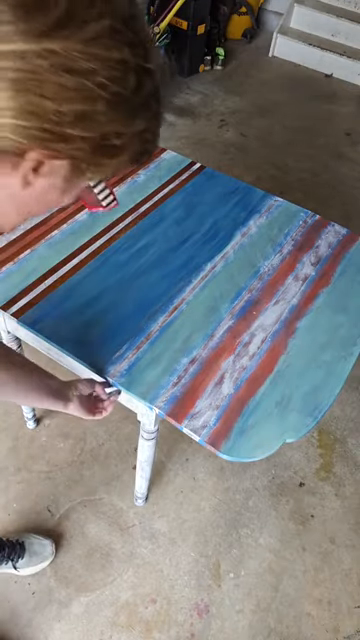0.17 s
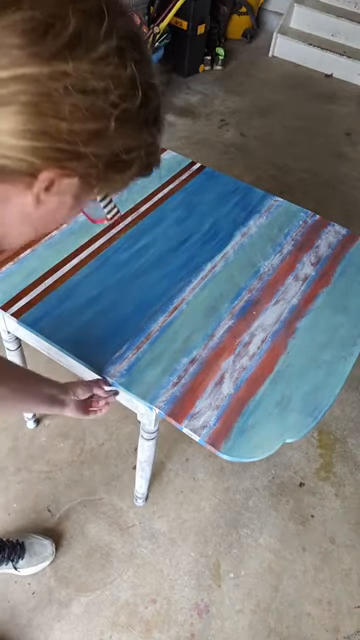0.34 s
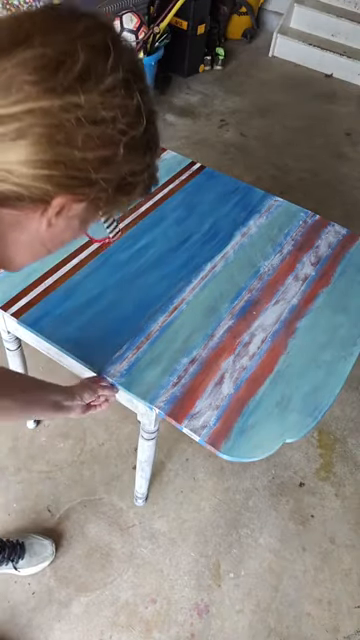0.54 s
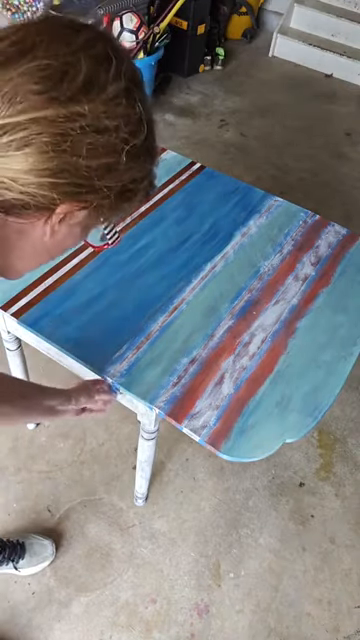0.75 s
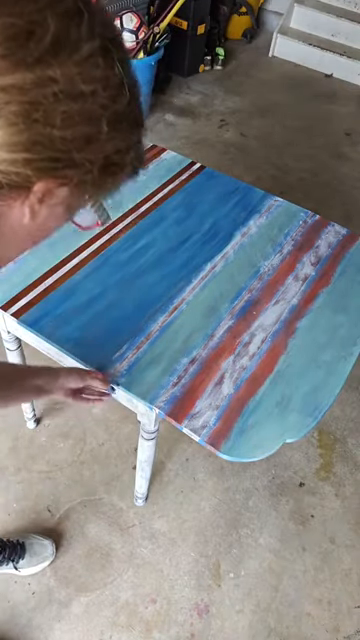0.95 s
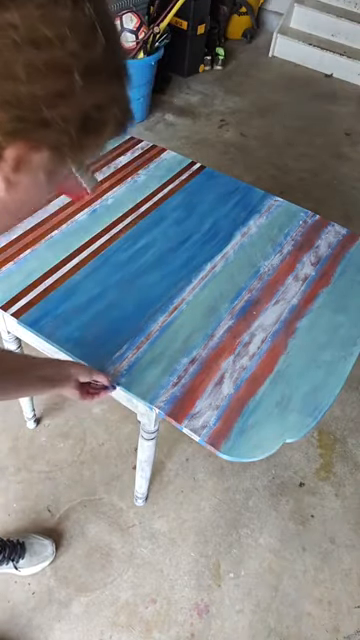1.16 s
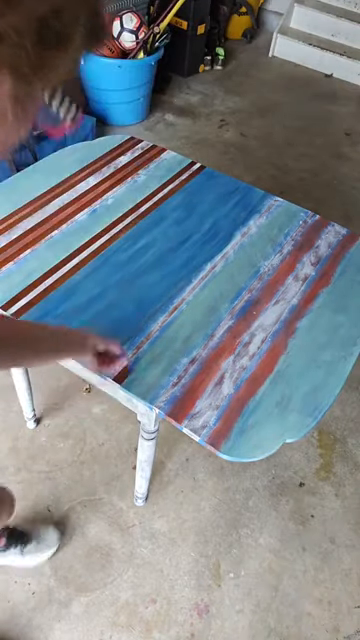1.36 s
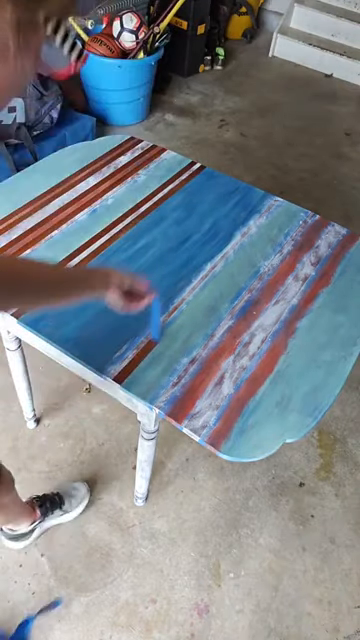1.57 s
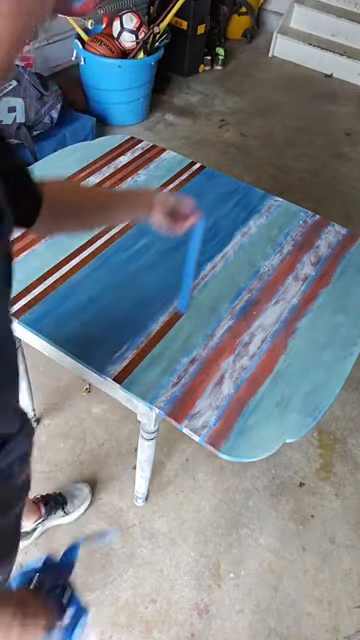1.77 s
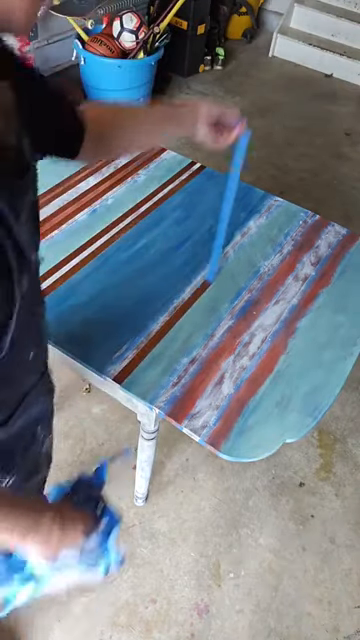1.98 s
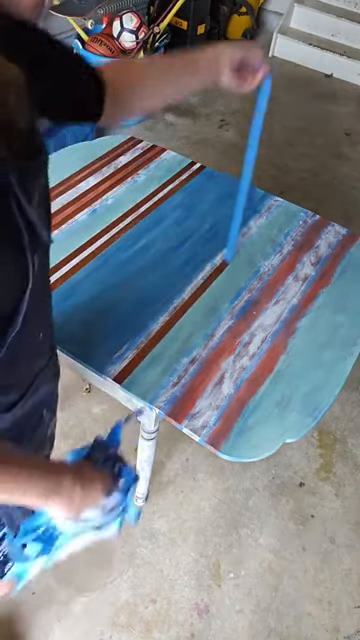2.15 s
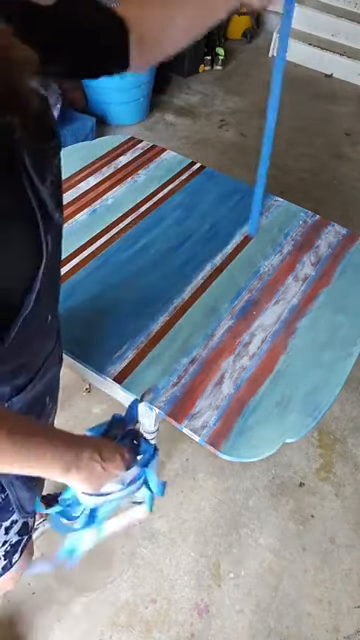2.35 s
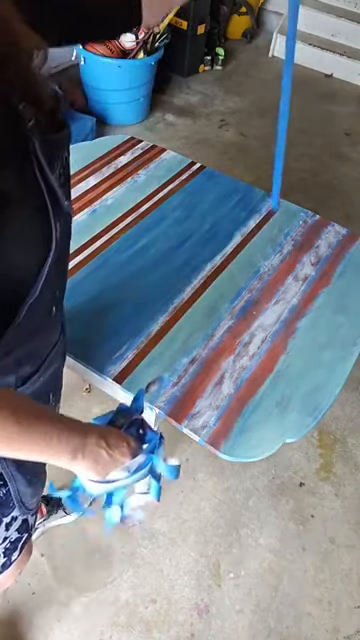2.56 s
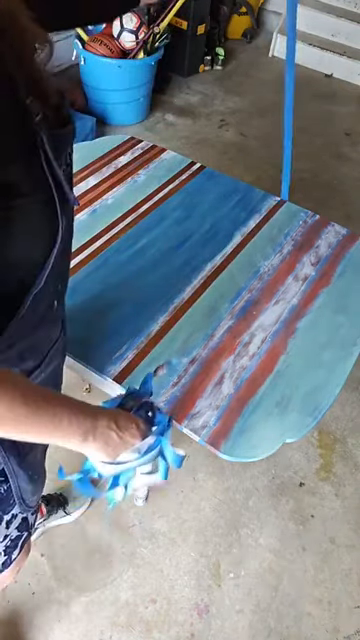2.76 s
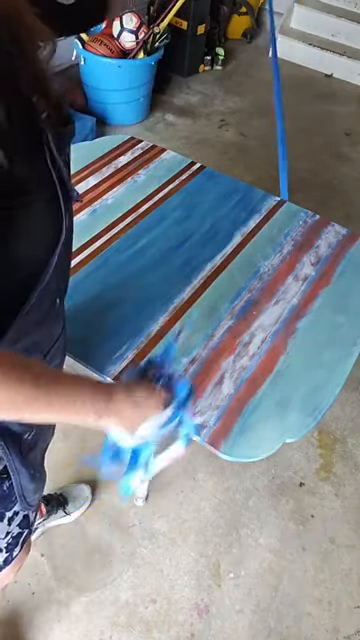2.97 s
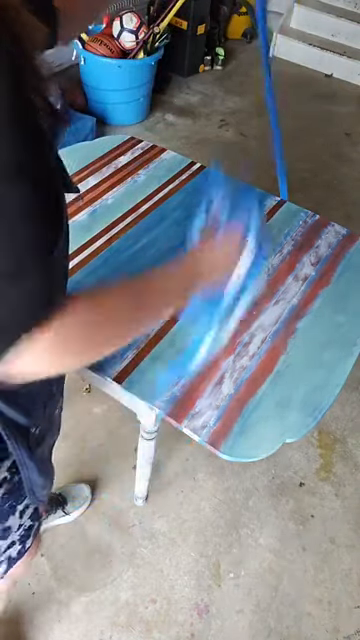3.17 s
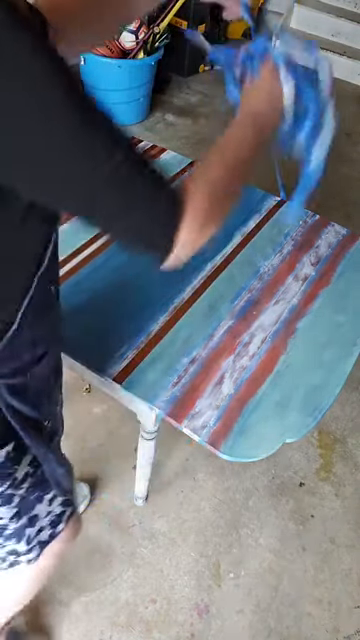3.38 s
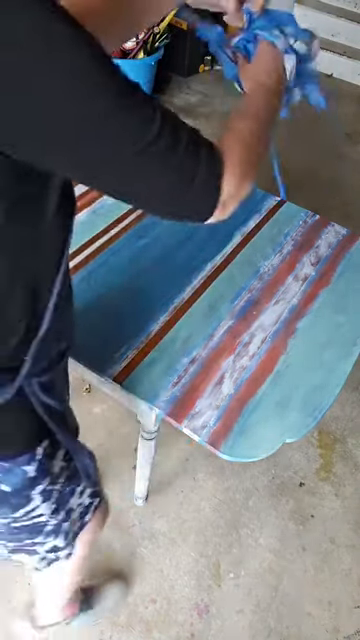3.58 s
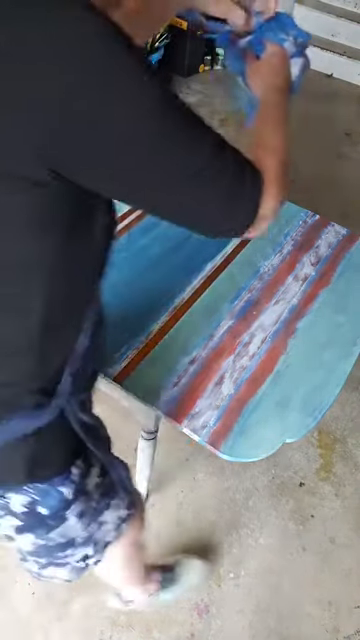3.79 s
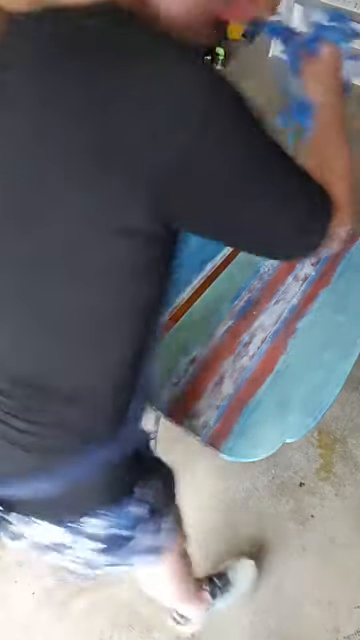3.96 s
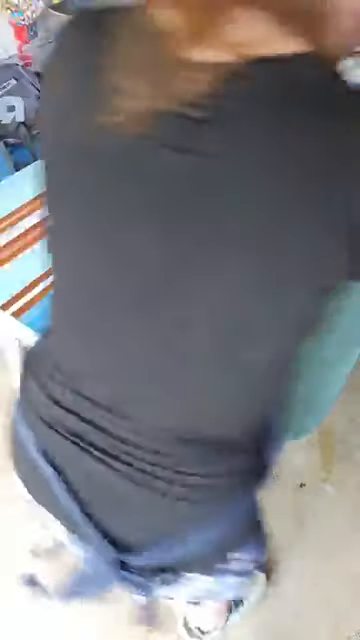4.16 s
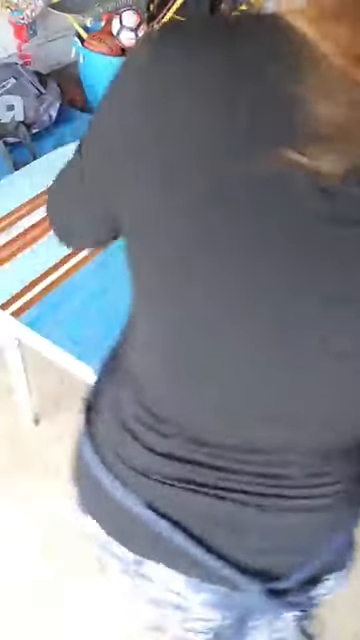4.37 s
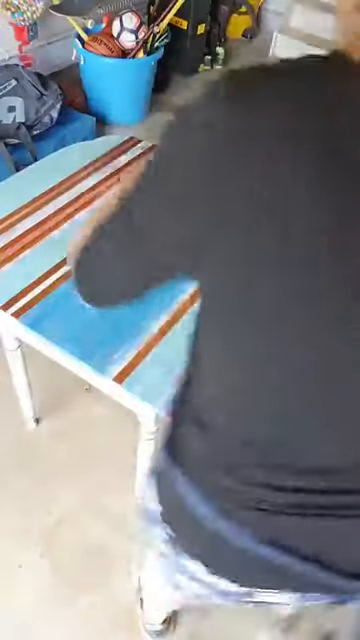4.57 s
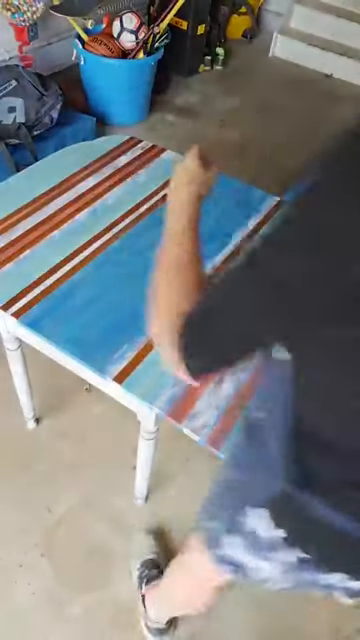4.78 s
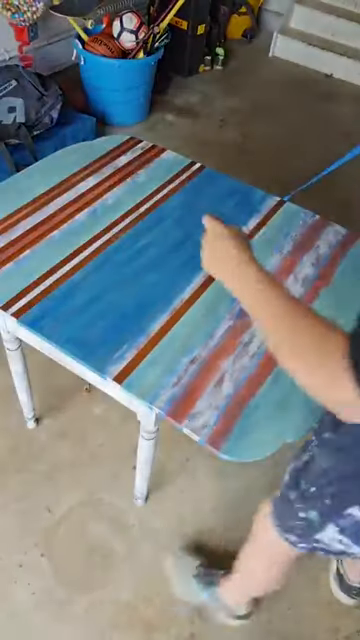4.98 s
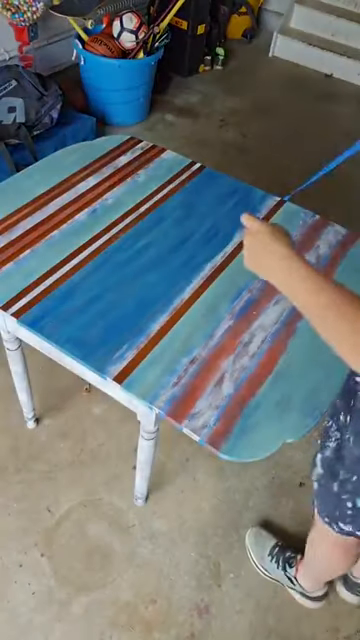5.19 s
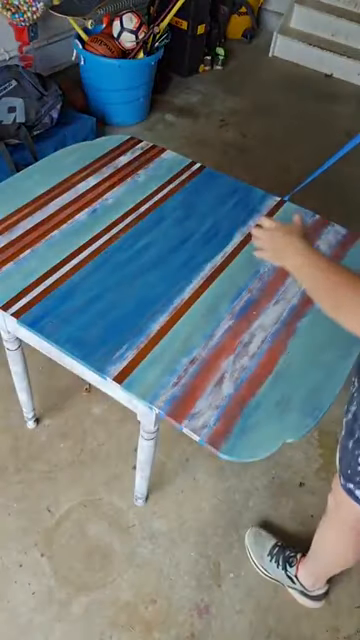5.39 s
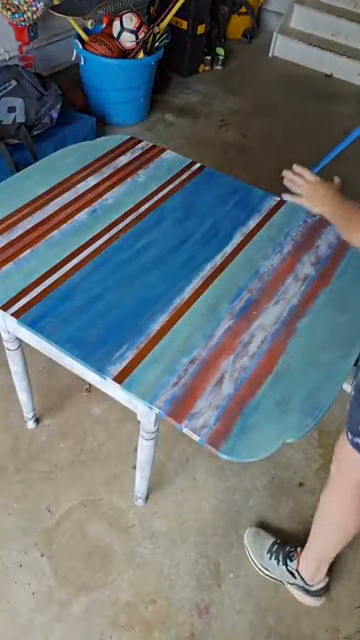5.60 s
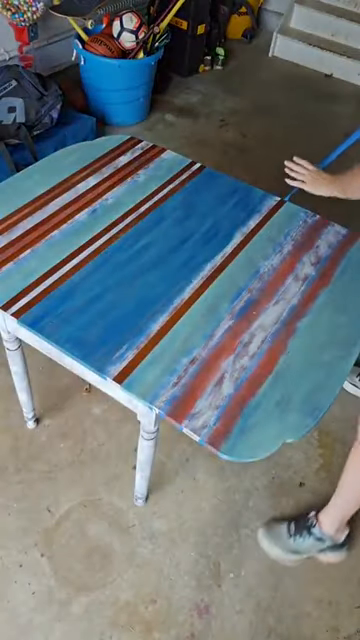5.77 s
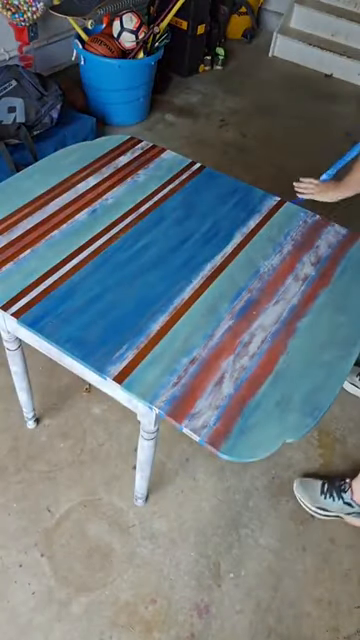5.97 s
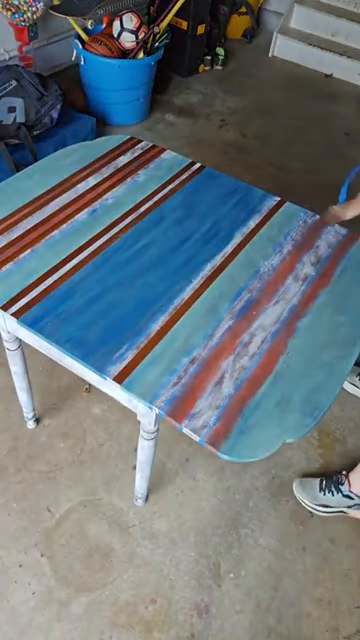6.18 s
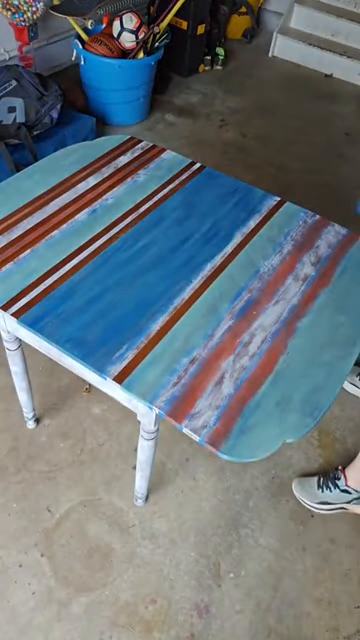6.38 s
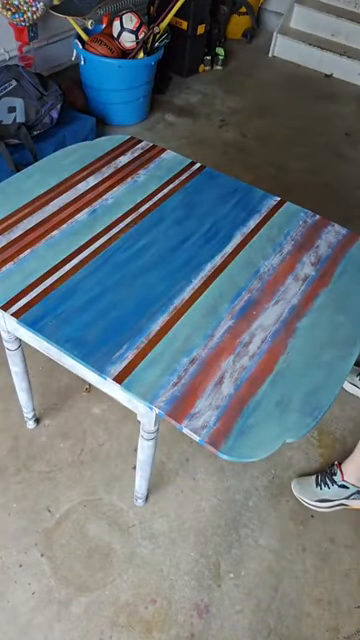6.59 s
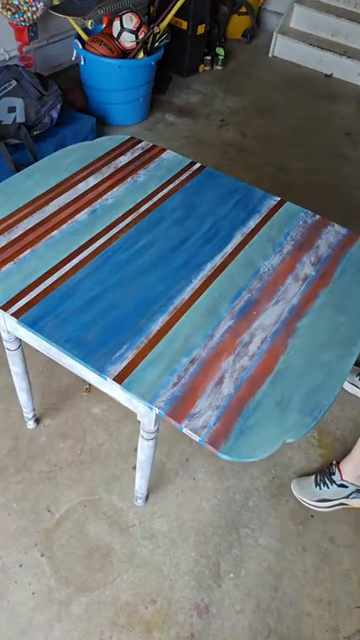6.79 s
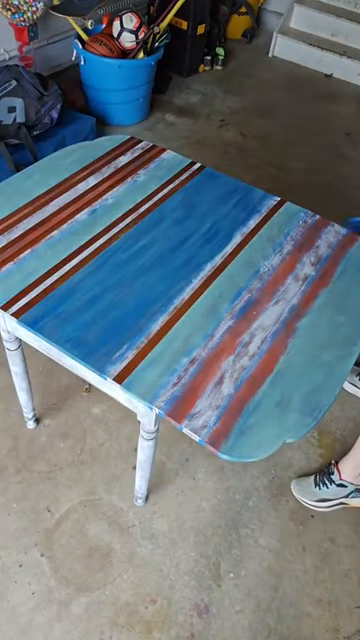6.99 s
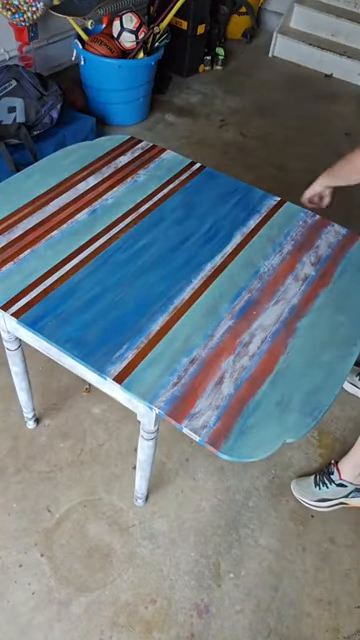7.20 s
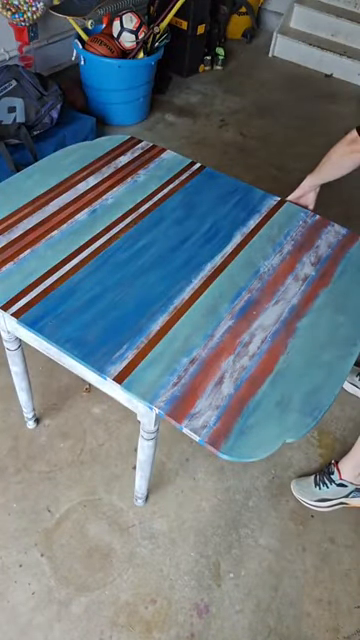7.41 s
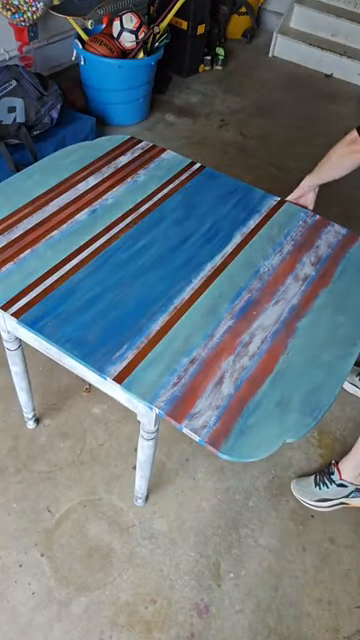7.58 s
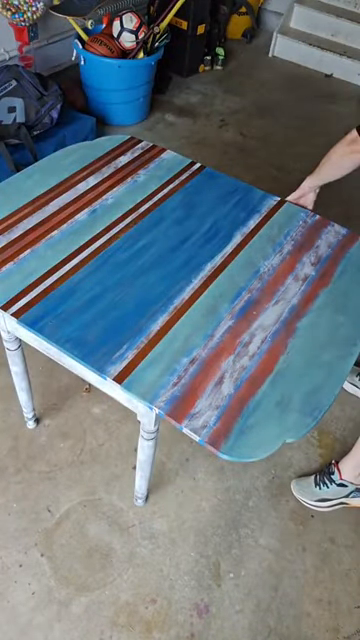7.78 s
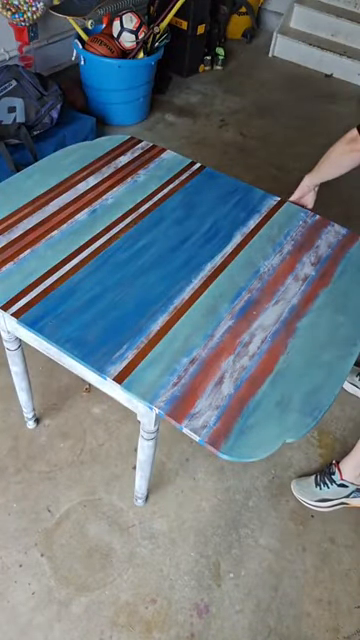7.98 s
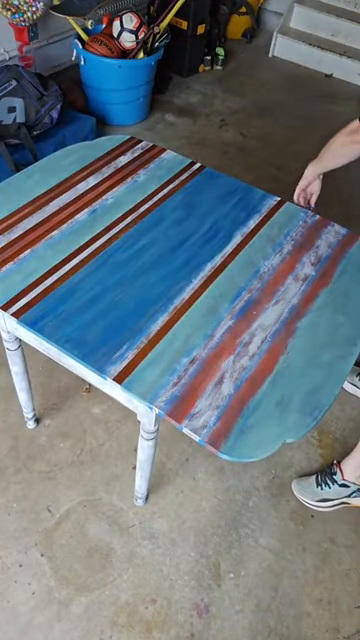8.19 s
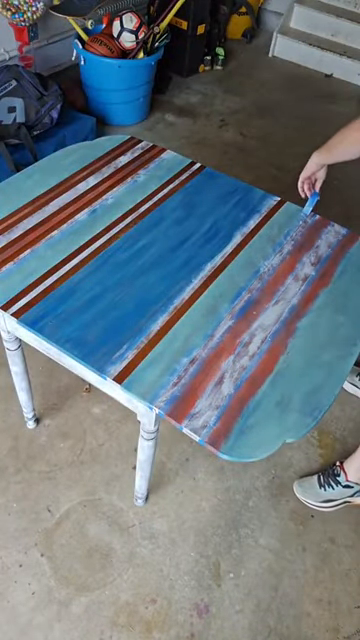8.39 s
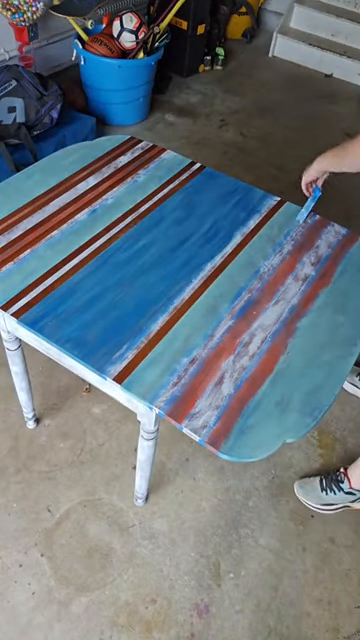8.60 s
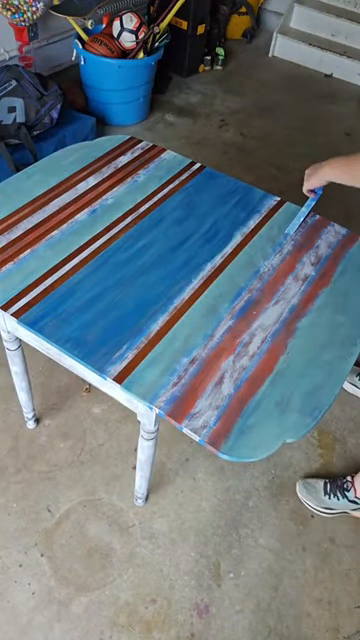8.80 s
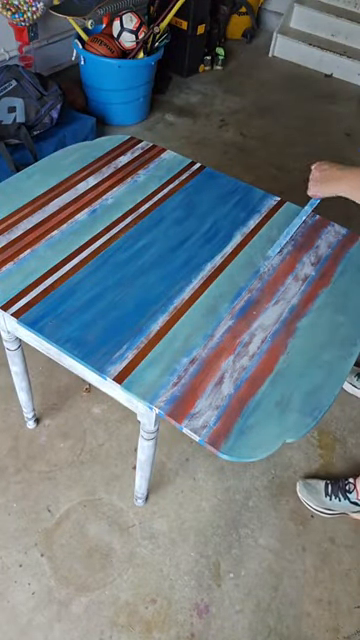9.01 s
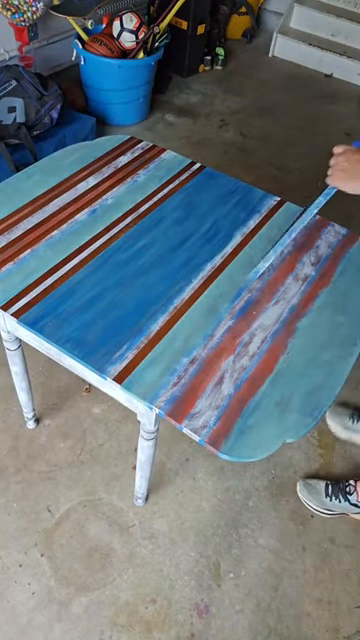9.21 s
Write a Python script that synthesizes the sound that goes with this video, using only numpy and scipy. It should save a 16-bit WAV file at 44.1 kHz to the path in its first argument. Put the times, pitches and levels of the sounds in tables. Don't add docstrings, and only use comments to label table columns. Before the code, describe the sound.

A close stereo microphone in a concrete garage with a short, hard echo; low motor hum, a faint distant engine and soft hiss throughout. At 0.1 s a click and gritty shoe scuff, then tiny nail picks and papery fumbling, with a tap at 0.7. From about 1.3 to 2.75 s tape peels off a wooden table: a dense, loud, buzzing rasp with airy hiss, ringing the tabletop and climbing unevenly in pitch, then stopping abruptly. A small tap at 3.07; from 3.1 to 4 s a ball of tape crinkles with sharp snaps. Shoes scrape and step on grit from 4.1 to 5.2, strongest near 4.4 and 4.9. Crinkles and softer steps return around 5.6 to 7.15, loudest near 6.0 and 6.65. A quiet gap, a firm knock at 8.07, then a second, shorter peel from 8.35, broken by a hard knock at 8.57, wavering up and down until the end at 9.25.

```python
import sys
import numpy as np
from scipy import signal
from scipy.fft import rfft, irfft
from scipy.io import wavfile
from scipy.ndimage import uniform_filter1d

SR = 44100
rng = np.random.default_rng(int(sys.argv[2]) if len(sys.argv) > 2 else 0)


def transcribe(u):
    v = np.clip(np.atleast_2d(u).T, -1, 1)
    q = np.round(v * 32767).astype(np.int16)
    wavfile.write(sys.argv[1], SR, q)


def boost(x):
    u = np.asarray(x, float) / 20
    return 10 ** u


N = 407925

MODE_HZ = [55, 95, 140, 222, 261, 292, 348, 410, 481, 548, 620, 690, 807, 889, 976, 1053, 1227, 1440, 1645,
           2280]
# width/Hz, level/dB
MODE_SHAPE = [(25, -2.5), (15.9, -11.5), (15.6, 4.5), (32, -6), (16.2, 6), (17.9, 1), (18.6, 4), (30.5, -9),
              (24.2, -0.5), (22.7, 2.5), (30, 0), (16.4, 2), (24, 4.5), (18.2, 7.5), (29.8, -1),
              (30.1, -42), (20, -1), (50.3, -18), (18, -3.5), (41.3, -20)]


def evened(x):
    return x / np.sqrt(np.mean(x ** 2) + 1e-20)


def read(points, hz):
    f, value = np.transpose(points)
    return np.interp(np.log(hz + 1), np.log(f + 1), value)


def track(tables, column, rest):
    t, out = np.arange(N) / SR, np.full(N, float(rest))
    for rows in tables:
        s, value = np.transpose(rows)[[0, column]]
        inside = (t >= s[0]) & (t <= s[-1])
        out[inside] = np.interp(t[inside], s, value)
    return out


def colour(x, points):
    log_gain = np.log(boost(read(points, abs(np.fft.fftfreq(8192, 1 / SR)))))
    taps = np.fft.ifft(np.exp(np.conj(signal.hilbert(log_gain)))).real[:4096]
    return signal.oaconvolve(x, taps)[:len(x)]


def band(x, lo_hz, hi_hz):
    sos = signal.butter(2, [lo_hz, min(hi_hz, SR / 2.1)], "band", fs=SR, output="sos")
    return signal.sosfilt(sos, x)


def resonate(x, hz, width_hz):
    return signal.lfilter(*signal.iirpeak(hz, hz / width_hz, SR), x)


def drift(per_s, step=1):
    knots = rng.standard_normal(4000)
    return np.interp(np.arange(0, N, step) / SR * per_s, np.arange(len(knots)), knots)


def grains(per_s, spread_db, clump_db, clumps_per_s):
    hit = rng.random(N) < per_s / SR
    size = np.minimum(rng.exponential(1, N), 5)
    sign = rng.choice([-1., 1.], N)
    return evened(hit * sign * boost(spread_db * size + clump_db * drift(clumps_per_s)))


def strokes(rows):
    power = np.zeros(N // 16 + 1)
    t = np.arange(len(power)) * 16 / SR
    for s, db, swell_s, fade_s in rows:
        power += boost(db - 20 * np.maximum((s - t) / swell_s, (t - s) / fade_s)) ** 2
    return np.repeat(np.sqrt(power), 16)[:N]


def peel():
    # t/s, panel level/dB, favoured pitch f/Hz, stiffness of the wood under the peel point (0-1)
    pulls = [
        [(1.2, -88.5, 227, 1), (1.364, -50.5, 252, 0.17), (1.434, -42.5, 260, 0.3), (1.78, -40, 307, 0),
         (1.86, -37.5, 360, 0.43), (2.302, -41.5, 390, 0.7), (2.4, -37, 390, 0.59), (2.6, -38.5, 430, 0.84),
         (2.68, -35.5, 504, 0.65), (2.72, -46.5, 405, 0.45), (2.79, -77, 450, 0)],
        [(8.34, -83, 452, 0.7), (8.398, -44.5, 480, 0.37), (8.5, -61, 342, 0.76), (8.58, -45, 250, 0.18),
         (8.792, -45, 273, 0.63), (8.93, -41, 348, 0.25), (9.03, -44.5, 408, 0.36), (9.08, -43, 460, 0),
         (9.14, -41, 384, 0.3), (9.25, -41.5, 294, 0.58)],
    ]
    # t/s, f/Hz
    leg_path = [(1.2, 85), (1.9, 80), (2.85, 110), (8.3, 160), (9.25, 160)]
    # t/s,
    # mode f/Hz, gain/dB, half length/s
    surges = [(1.51, 137, 11, 0.022), (1.49, 261, 2, 0.053), (1.656, 548, 6, .04), (1.704, 261, 3.5, .05),
              (1.785, 548, 11, .03), (1.853, 292, 4, .04), (1.89, 690, 5.5, .04), (1.92, 348, 5, 0.055),
              (1.965, 889, 10, 0.033), (2.017, 548, 11, 0.14), (2.026, 348, 4, 0.032),
              (2.184, 889, 10, 0.1), (2.183, 348, 5, 0.049), (2.286, 889, 4, 0.028), (2.42, 348, 1, 0.045),
              (2.414, 807, 9.5, 0.031), (2.454, 548, 1, 0.042), (2.501, 889, 9, 0.018),
              (2.565, 1227, 5, 0.061), (2.575, 807, 10, 0.022), (2.66, 548, 5, 0.026),
              (2.65, 481, 2, 0.021), (2.702, 137, 12, 0.025), (2.752, 292, 19, 0.056), (1.5, 548, -8, 0.11),
              (2.554, 548, -2, 0.036), (8.6, 548, -7, 0.1), (9.04, 348, -2, .02), (8.624, 137, 4.5, 0.045),
              (8.73, 137, 3, 0.027), (8.74, 1645, 9, .05), (8.4, 222, 12, .05), (8.667, 222, 6, .04),
              (8.774, 222, 7, 0.026), (8.782, 889, 7, 0.035), (8.83, 222, 23, 0.035),
              (8.872, 889, 19.5, 0.046), (8.891, 481, 17, 0.05), (8.938, 348, 6, 0.04),
              (8.983, 548, 10, 0.034), (9.008, 348, 8.5, 0.043), (9.032, 889, 22, 0.033),
              (9.085, 348, 12.5, 0.054), (9.076, 548, 14, 0.048), (9.164, 348, 9, 0.029),
              (9.18, 137, 2, 0.04), (9.22, 1645, 19, 0.042), (9.22, 292, 11, 0.037)]
    # f/Hz, level/dB per Hz
    rasp = [(60, -29), (100, -19), (200, -3), (400, 17), (800, 7), (1500, -33), (3000, -50), (6000, -14),
            (16000, -19)]
    # f/Hz, level/dB per Hz
    glue = [(800, -49), (1400, 2.5), (2000, 1.5), (3200, -9), (5500, -3), (8000, -7.5), (11000, -13),
            (16000, 1)]

    step = 64

    def every_sample(control):
        return np.repeat(control, step)[:N]

    level_db, stiff = track(pulls, 1, -120), track(pulls, 3, 0)
    favoured_hz, leg_hz = track(pulls, 2, 400)[::step], track([leg_path], 1, 100)[::step]
    over_db = np.maximum(level_db + 40, -20)

    upper_db = -28.5 + 35 * stiff
    hiss_db = -9 - 0.41 * over_db
    octaves_up = np.log2(every_sample(favoured_hz) / min(MODE_HZ[4:]))
    legs_db = -3 - 0.19 * over_db - 13 * octaves_up

    slips = grains(per_s=3500, spread_db=2.8, clump_db=1.8, clumps_per_s=90)
    t = np.arange(0, N, step) / SR
    LEGS, PANEL, UPPER = range(3)
    groups = np.zeros((3, N))
    plain_power, surging_power = np.zeros((2, 3, len(t)))
    for hz, (width_hz, db) in zip(MODE_HZ, MODE_SHAPE):
        gain = boost(db + 2.5 * drift(9, step))
        if hz < 180:
            group = LEGS
            gain = gain * boost(-45 * np.log2(hz / leg_hz) ** 2)
        elif hz < 750:
            group = PANEL
            near = boost(-60 * np.log2(hz / favoured_hz) ** 2)
            near_octave = boost(-60 * np.log2(hz / 2 / favoured_hz) ** 2)
            gain = gain * (near + 0.39 * near_octave + 0.24)
        else:
            group = UPPER
        surge_db = np.zeros(len(t))
        for s, mode_hz, up_db, half_s in surges:
            if abs(mode_hz / hz - 1) < .055:
                surge_db += up_db * np.exp(-((t - s) / half_s) ** 2)
        surging = gain * boost(surge_db)
        plain_power[group] += gain ** 2
        surging_power[group] += surging ** 2
        ring = resonate(every_sample(surging) * slips, hz, width_hz) / np.sqrt(width_hz)
        if group == LEGS:
            ring = resonate(ring, hz, 2 * width_hz)
        groups[group] += ring

    for group in range(3):
        groups[group] /= np.sqrt(uniform_filter1d(groups[group] ** 2, 2600) + 1e-12)
        groups[group] *= every_sample(np.sqrt(surging_power[group] / plain_power[group]))
    legs, panel, upper = groups
    table = panel + boost(upper_db) * upper + boost(legs_db) * legs
    table += boost(-14.0) * evened(colour(slips, rasp))
    fizz = grains(per_s=7000, spread_db=2.5, clump_db=1.8, clumps_per_s=200)
    hiss = boost(hiss_db) * evened(colour(fizz, glue))
    jerk_db = 1.12 * drift(45)
    return boost(level_db + jerk_db) * (table + hiss)


def knocks():
    # t/s, peak level/dB
    blows = [
        (0.702, -57),
        (1.002, -65),
        (3.066, -47),
        (8.0737, -38),
        (8.395, -54),
        (8.436, -59),
        (8.571, -32.5),
    ]
    out, t = np.zeros(N), np.arange(9000) / SR
    strike_db = 4 * rng.standard_normal((len(blows), len(MODE_SHAPE)))
    hz, (width_hz, db) = np.array(MODE_HZ), np.transpose(MODE_SHAPE)
    decay = np.exp(-1.7 * np.pi * width_hz[:, None] * t)
    rings = decay * np.sin(2 * np.pi * hz[:, None] * t)
    for (s, blow_db), spot_db in zip(blows, strike_db):
        ring = (boost(1.4 * db + spot_db) * (hz > 320)) @ rings
        start = round(s * SR)
        out[start:start + len(t)] += boost(blow_db) * ring / abs(ring).max()
    return out


def crinkles():
    # peak t/s, level/dB, swell/s, fade/s
    fumbles = [(.4, -65, 0.023, 0.035), (.602, -67, 0.15, .055), (.7, -55, 0.0033, 0.16),
               (.84, -62.5, 0.017, 0.14), (1.01, -57.5, 0.058, 0.041), (1.3, -58.5, 0.18, 0.037),
               (8.078, -43.5, 0.012, 0.041), (8.4, -46, 0.038, 0.021)]
    # peak t/s, level/dB, swell/s, fade/s
    squeezes = [(3.068, -53.5, 0.014, 0.19), (3.281, -43, 0.0049, 0.13), (3.39, -46.5, 0.16, 0.29),
                (3.49, -45.5, 0.064, .02), (3.54, -42, 0.055, 0.053), (3.64, -44, 0.14, 0.063),
                (3.72, -50, 0.061, .02), (3.76, -43, 0.017, 0.017), (3.9, -41.5, .11, 0.047),
                (4.01, -47.5, 0.08, 0.082), (4.21, -51, 0.78, 0.066), (4.41, -54, .06, 0.32),
                (4.8, -63, 0.012, 0.15), (4.898, -43.5, 0.037, 0.17), (5.131, -49, .004, 0.23),
                (5.59, -63.5, 0.027, 0.075), (5.74, -50.5, 0.028, 0.25), (5.97, -38.5, .06, .1),
                (6.04, -47, .1, 0.056), (6.23, -52.5, .01, 0.37), (6.33, -53, 0.2, 0.19),
                (6.58, -44, 0.35, 0.06), (6.651, -39.5, 0.044, 0.075), (6.82, -51, 0.55, 0.2),
                (6.92, -44, 0.058, 0.26), (7.05, -45.5, 0.22, 0.23), (7.15, -47, 0.53, 0.057)]
    # f/Hz, level/dB per Hz
    paper = [(300, -39.5), (700, -20), (1300, -14), (2000, -5), (3000, -4.5), (4300, -2.5), (6000, -5),
             (9000, -10), (12500, -12.5), (16000, -1.5)]
    buckles = grains(per_s=2600, spread_db=4.2, clump_db=2.3, clumps_per_s=90)
    return boost(-4.5) * strokes(fumbles + squeezes) * evened(colour(buckles, paper))


def snaps(rows, echo_db, bounce_db, rise_s):
    length, peak_s = 2000, .004
    out, t = np.zeros(N + length), np.arange(length) / SR
    noise = rng.standard_normal((len(rows), length))
    fall_s = max(.001, rise_s)
    envelope = np.exp(-abs(t - peak_s) / np.where(t < peak_s, rise_s, fall_s))
    for (s, db, low_db, top_db), puff in zip(rows, noise):
        burst = puff * envelope
        start = round((s - peak_s) * SR)
        for lo_hz, hi_hz, part_db in ((350, 1600, low_db), (2000, 7000, 0), (9000, 16000, top_db)):
            part = band(burst, lo_hz, hi_hz)
            out[start:start + length] += boost(db + part_db) * part / abs(part).max()
    return np.outer([1, boost(echo_db), boost(bounce_db)], out[:N])


def picks():
    # t/s, peak level/dB, low part above the peak/dB, top part above the peak/dB
    tugs = [(0.106, -36, -17, -6), (0.6999, -41.5, -29, 13.5), (0.9718, -66, -1, 12),
            (1.0026, -55, -4, 7.5), (3.0679, -55, 14, 15), (4.1363, -40, -23, -6), (7.1463, -37, -24, 2.5),
            (8.077, -47.5, 15, 15.5), (8.392, -50, 11, 1), (8.4373, -44, 12, 5), (8.571, -63, 11, 4)]
    return snaps(tugs, echo_db=0.5, bounce_db=-1.5, rise_s=0.00034)


def creases():
    # t/s, peak level/dB, low part above the peak/dB, top part above the peak/dB
    folds = [(3.1354, -45, -4, -16), (3.2845, -40, -21, -10), (3.363, -35.5, -19, -10),
             (3.378, -35, -26, -14), (3.388, -30, -19, -6), (3.4828, -30, -15, -3), (3.5254, -33, -28, -3),
             (3.626, -42, -7, 3), (3.6444, -40, -8, 1), (3.6995, -38, -9, -9), (3.7165, -30.5, -36, -8),
             (3.7576, -38.5, -25, 3), (3.8549, -41, -30, -7), (3.9013, -37, -28, -8), (3.9915, -50, -21, 5),
             (4.011, -38, -22, 0), (4.3558, -61.5, -1, -13), (4.8866, -41.5, -8, -4), (5.132, -46, -9, -13),
             (6.224, -55, -20, -4), (6.493, -38, -20, -8), (6.6531, -37, -24, -4), (6.9036, -39.5, -31, -1)]
    return snaps(folds, echo_db=-7.5, bounce_db=-4, rise_s=0.0017)


def scuffs():
    # peak t/s, level/dB, swell/s, fade/s, dullness (0-1)
    drags = [(0.103, -44, 0.0068, 0.12, 0.38), (3.07, -64.5, 0.049, 0.27, 0.5),
             (3.359, -57, 0.035, 0.14, 0.18), (3.53, -55.5, 0.044, 0.073, 0.37),
             (3.92, -60, 0.26, 0.23, 0.4), (4.05, -61, 0.048, 0.09, 0.96), (4.16, -54, 0.027, 0.098, 0.57),
             (4.2, -49.5, 0.084, 0.1, 0.7), (4.349, -52, 0.003, 0.54, 0.43),
             (4.418, -41, 0.091, 0.07, 0.35), (4.46, -56, 0.054, 0.23, 0.92),
             (4.79, -64.5, 0.0036, 0.46, 0.77), (4.902, -42, 0.038, .15, 0.77),
             (4.935, -46.5, 0.036, .05, 0.8), (4.97, -42.5, 0.09, 0.043, 0.8),
             (5.129, -58.5, 0.003, .2, 0.16), (5.2, -50.5, 0.11, 0.19, 0.63), (5.7, -58, 0.023, 0.49, 0.6),
             (5.595, -66.5, .01, .3, 0.5), (5.92, -57, 0.28, .1, 0.57), (5.971, -46.5, 0.06, 0.11, 0.32),
             (6.48, -66.5, 0.036, 0.82, 0.2), (6.8, -62, 0.15, 0.094, 0.1), (7.08, -60.5, 0.27, 0.14, 0.8)]
    # f/Hz, level/dB per Hz
    grit_bright = [(120, -37), (300, -1.5), (600, -6), (1200, 2), (2000, 9.5), (3500, -2), (6000, -1.5),
                   (10000, -9.5), (16000, -9)]
    # f/Hz, level/dB per Hz
    grit_dull = [(120, -38), (250, -12), (500, -2.5), (900, 0), (1600, -2), (2800, -10), (5000, -13),
                 (9000, -29), (16000, -57.5)]
    grit = grains(per_s=6800, spread_db=0.5, clump_db=2.0, clumps_per_s=87)
    bright, heavy = colour(grit, grit_bright), colour(grit, grit_dull)
    bright, heavy = (v / np.std(band(v, 600, 1800)) for v in (bright, heavy))
    s, db, swell_s, fade_s, dull = np.transpose(drags)
    light_db, hard_db = 20 * np.log10(np.clip([1 - dull, dull], 1e-3, 1))
    light = strokes(zip(s, db + light_db, swell_s, fade_s))
    hard = strokes(zip(s, db + hard_db, swell_s, fade_s))
    return light * bright + hard * heavy


def thumps():
    # t/s, peak level/dB, f/Hz, length/s
    pushes = [(0.125, -47, 510, 0.013), (0.104, -36, 3500, 0.025), (0.553, -64.5, 890, 0.038),
              (0.732, -62.5, 554, 0.092), (4.22, -57, 180, 0.026), (4.84, -48.5, 150, 0.028),
              (5.13, -40, 1450, 0.038), (5.589, -56, 484, 0.056), (5.689, -50, 377, 0.021),
              (5.985, -46, 390, 0.04), (6.10, -61, 189, 0.036), (8.091, -45, 336, 0.019)]
    out, t = np.zeros(N), np.arange(8000) / SR
    noise = rng.standard_normal((len(pushes), len(t)))
    for (s, db, hz, length_s), puff in zip(pushes, noise):
        envelope = np.exp(-t / length_s) * (1 - np.exp(-t / .004))
        push = band(puff, hz / 1.3, hz * 1.3) * envelope
        start = round(s * SR)
        out[start:start + len(t)] += boost(db) * push / abs(push).max()
    return out


def ports(x, feed):
    # delay/ms, left level/dB, right level/dB
    bounce_rows = [
        (1.1, -8, -20),
        (2.6, -7, 1),
        (3.8, 0, -13),
        (7.7, -7.5, -9.5),
    ]
    # t/s, lag of the left port/samples
    lag = [(0, 11), (.5, 1), (1.3, 0), (2.8, -8), (4.05, -13), (4.1, 9), (5.5, 9), (6.15, 5), (6.2, -6),
           (9.25, -4)]
    taps, at = np.zeros((2, 400)), np.arange(N)
    for k, (ms, *db) in enumerate(bounce_rows):
        taps[[0, 1], round(ms * SR / 1000) + np.array([3 * k, 9 - 3 * k])] = boost(np.array(db))
    bounced = signal.oaconvolve(feed[None], band(taps, 1500, 20000), axes=1)[:, :N]

    def delayed(samples):
        return np.clip(at - np.round(samples).astype(int), 0, N - 1)

    left, right = (x + v[delayed(7 * drift(2.5))] for v in bounced)
    return np.array([left[delayed(track([lag], 1, 0))], right])


def garage(x, first_ms):
    # f/Hz, t60/s
    decay = [(150, 0.54), (660, 0.46), (1740, 0.37), (4590, 0.4), (12000, 0.25)]
    taps = np.zeros((2, SR))
    at = np.arange(round(first_ms * SR / 1000), SR - 20, 20)
    at = at + rng.integers(0, 20, (2, len(at)))
    np.put_along_axis(taps, at, rng.choice([-1., 1.], at.shape), 1)
    hz, t, z = signal.stft(taps, SR, nperseg=256)
    tail = signal.istft(z * boost(-60 * t / read(decay, hz)[:, None]), SR, nperseg=256)[1]
    length = tail.shape[1]
    shared = 1 / (1 + (np.fft.rfftfreq(length, 1 / SR) / 300) ** 2)
    left, right = rfft(tail)
    tail = irfft([left, shared * left + np.sqrt(1 - shared ** 2) * right], length)
    return signal.fftconvolve(x[None], tail / np.linalg.norm(tail[0]), axes=1)[:, :N]


def echoes(feed):
    # f/Hz, level/dB
    walls = [(100, -8), (600, -6), (2200, 0), (16000, 0)]
    feed = colour(feed, walls)
    turn = 2 * np.pi * .9 * np.arange(N) / SR
    return garage(feed * np.cos(turn), 8) + garage(feed * np.sin(turn), 8)


def hum():
    # f/Hz, level/dB
    lines = [
        (55.54, -68),
        (59.12, -64),
        (120, -68),
        (180, -79),
        (239.96, -72),
    ]
    # t/s, f/Hz, level/dB
    engine = [(0, 89.3, -60), (.6, 89.6, -71), (1.2, 90, -63.5), (3, 91.6, -58), (3.6, 92.1, -60.5),
              (4.5, 92.7, -60.5), (5.5, 94, -65.5), (6.3, 94.8, -57), (7, 95.2, -57), (7.5, 95.6, -58.5),
              (7.8, 96.5, -73), (9.25, 97, -102)]
    t = np.arange(N) / SR
    in_step_s = .145
    out = np.zeros(N)
    for hz, db in lines:
        out += boost(db + 1.7 * drift(2.9)) * np.cos(2 * np.pi * hz * (t - in_step_s))
    turns = np.cumsum(track([engine], 1, 97) + .4 * drift(6)) / SR
    out += boost(track([engine], 2, -70) + 2.7 * drift(7.4)) * np.cos(2 * np.pi * turns)
    return np.sqrt(2) * out


def floor():
    # f/Hz, level/dB per Hz
    spectrum = [(25, -39.5), (60, -15), (120, -16), (200, -29), (300, -26), (400, -40.5), (900, -41.5),
                (2000, -52.5), (5500, -55.5), (6600, -38.5), (9000, -50), (12500, -47), (13200, -37),
                (16000, -31)]
    # f/Hz, likeness (0-1)
    likeness = [(60, 0.97), (240, 0.39), (950, 0.13), (3770, 0.024), (15000, 0.21)]
    # f/Hz, width/Hz, level/dB
    whine = [(7660, 110, -76)]
    frames, hz = N // 512 + 5, np.fft.rfftfreq(2048, 1 / SR)
    a, b, c, d, patches = rng.standard_normal((frames, len(hz), 5)).T
    patches = uniform_filter1d(uniform_filter1d(patches, size=20, axis=0), size=8, axis=1)
    same = np.clip(read(likeness, hz), -1, 1)[:, None]
    left, other = a + 1j * b, c + 1j * d
    z = np.array([left, same * left + np.sqrt(1 - same ** 2) * other])
    z *= boost(read(spectrum, hz)[:, None] + 2.1 * evened(patches))
    air = signal.istft(z, nperseg=2048, noverlap=1536)[1][:, :N]
    air *= boost(-64.5) / np.std(band(air, 300, 16000))
    for f, width_hz, db in whine:
        air += boost(db) * evened(resonate(rng.standard_normal((2, N)), f, width_hz))
    return air


def scene():
    # t/s, level/dB
    duck = [(0, 0), (.6, -4), (2.6, 2), (2.95, -4.5), (3.1, -2), (5, -0.5), (7.6, -2.2), (8.4, -1),
            (9.25, 1.5)]
    pull, steps, hands = peel() + knocks(), scuffs() + thumps(), crinkles()
    cracks, cracks_echo, cracks_bounce = picks() + creases()
    steady = boost(-1.5) * pull + boost(-1.5) * steps + boost(-3.0) * hands
    direct = ports(steady + boost(-2.5) * cracks, steady + cracks_bounce)
    to_walls = boost(-1.0) * pull + boost(-3.5) * steps + boost(0.5) * hands + cracks_echo
    background = boost(track([duck], 1, 0)) * (floor() + hum())
    return direct + echoes(to_walls) + background


def top_cut(x):
    return signal.sosfilt(signal.butter(12, 16670, fs=SR, output="sos"), x)


def record(dry):
    # f/Hz, level/dB
    lean_rows = [(60, 1.5), (300, 6), (600, 2), (1500, 2), (3000, 1.3), (15000, 2)]
    # f/Hz, level/dB
    mic = [(6000, 1), (8000, 1.5), (9300, 5.5), (10100, 3.5), (11000, 2.5), (12500, 3), (13500, 0),
           (15500, -5)]
    hz = np.fft.rfftfreq(N, 1 / SR)
    lean = boost(read(lean_rows, hz) / 2)
    response = boost(read(mic, hz)) * (hz < 15830)
    mix = irfft(rfft(dry) * np.array([lean, 1 / lean]) * response, N)
    return top_cut(mix)


dry = scene()
out = record(dry)
transcribe(out)
```